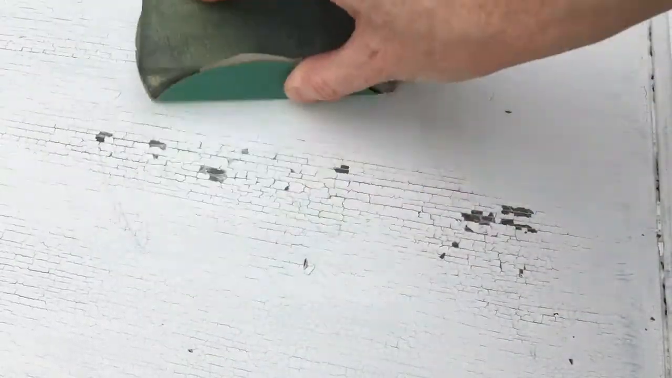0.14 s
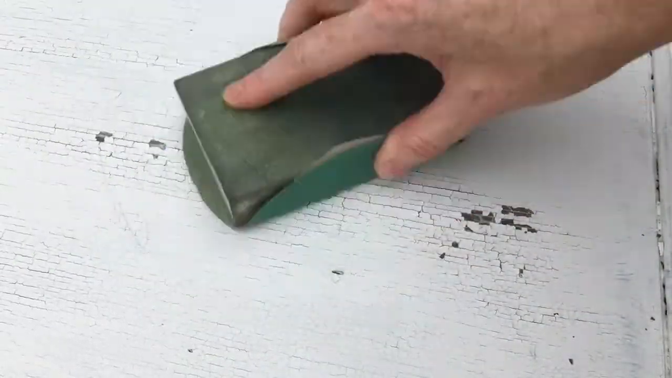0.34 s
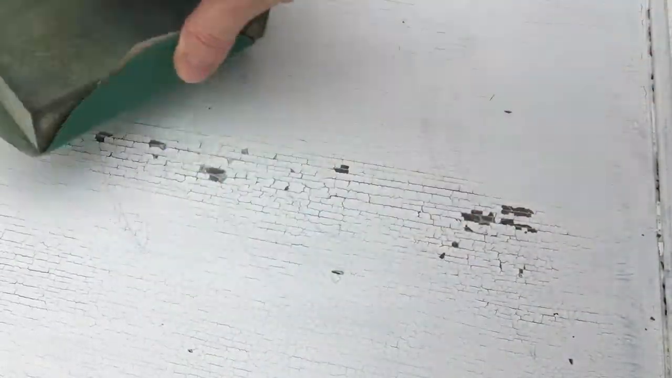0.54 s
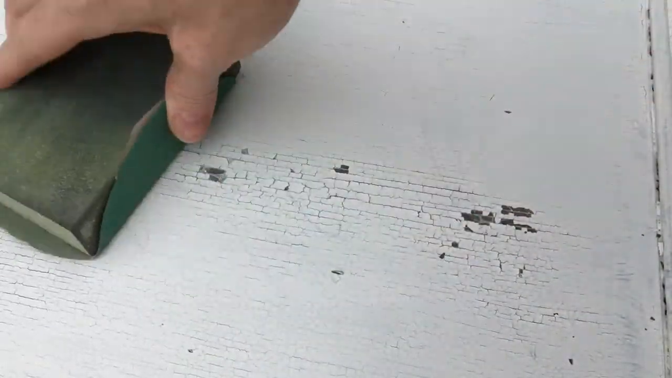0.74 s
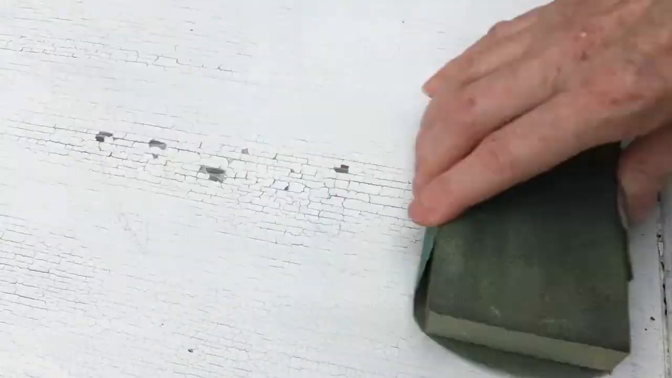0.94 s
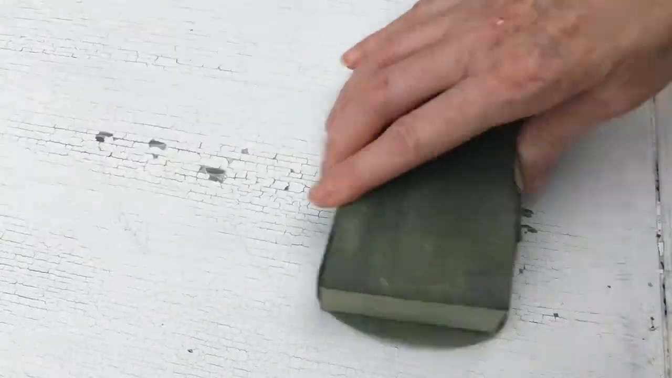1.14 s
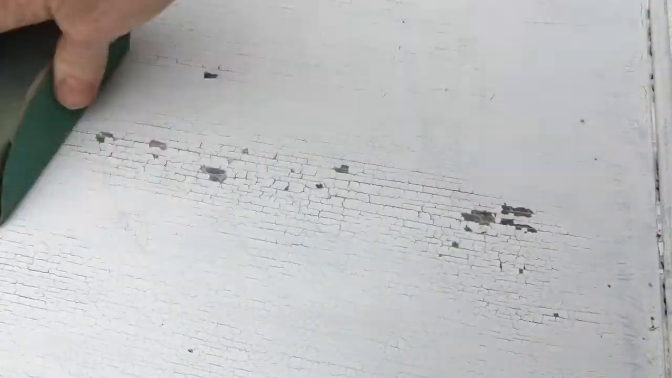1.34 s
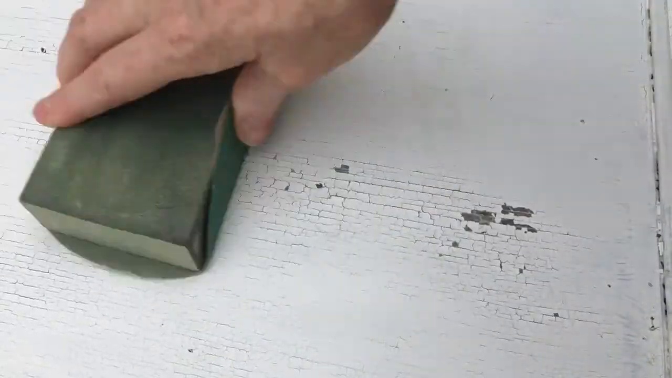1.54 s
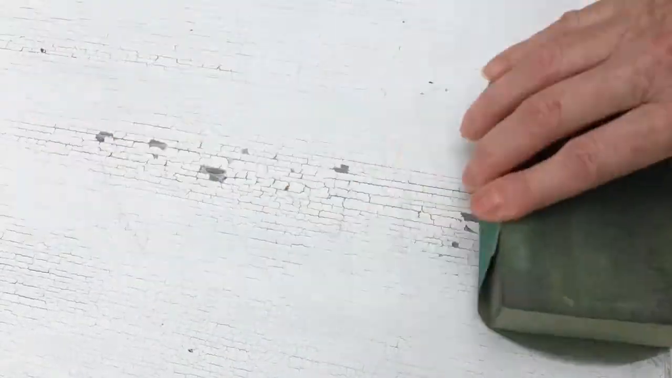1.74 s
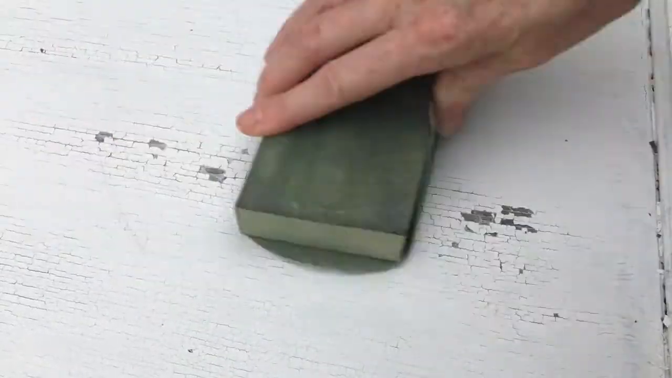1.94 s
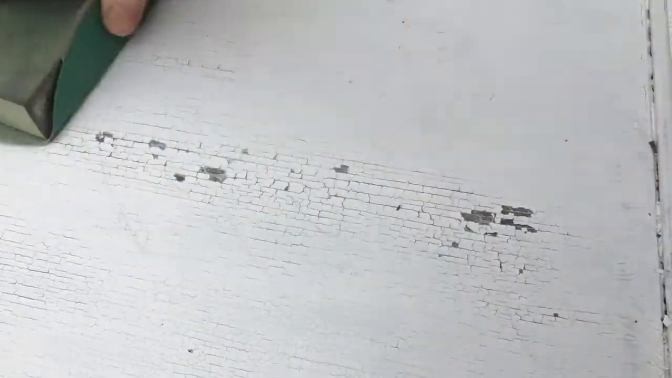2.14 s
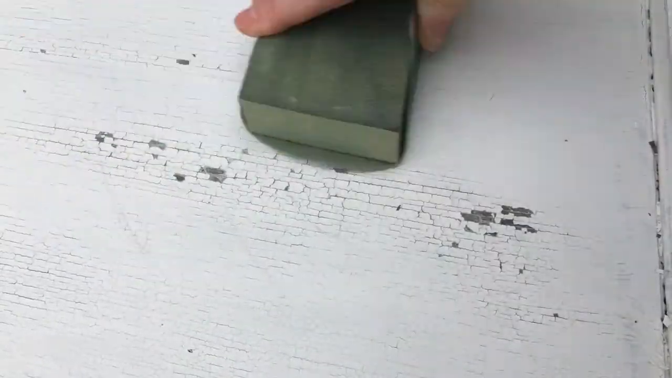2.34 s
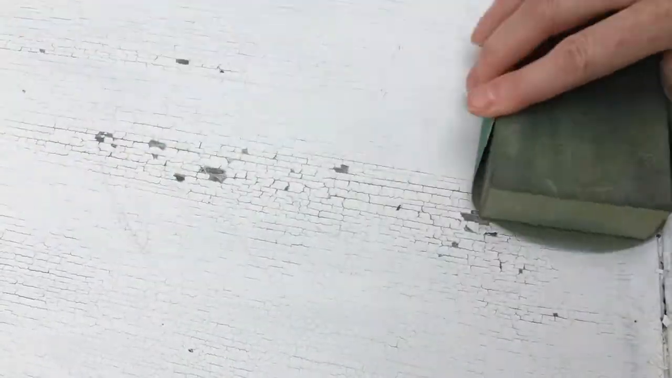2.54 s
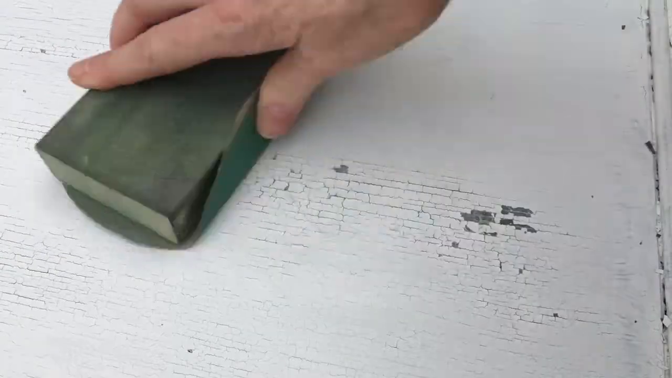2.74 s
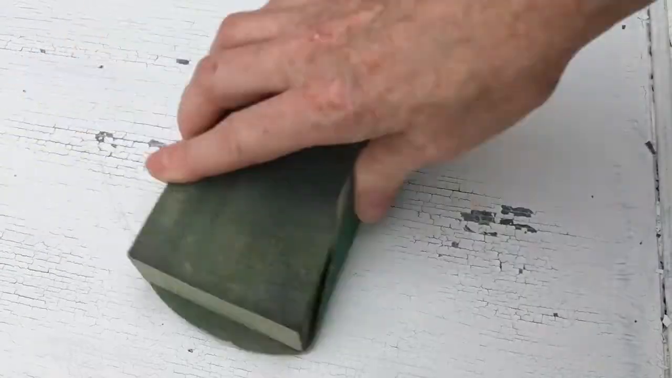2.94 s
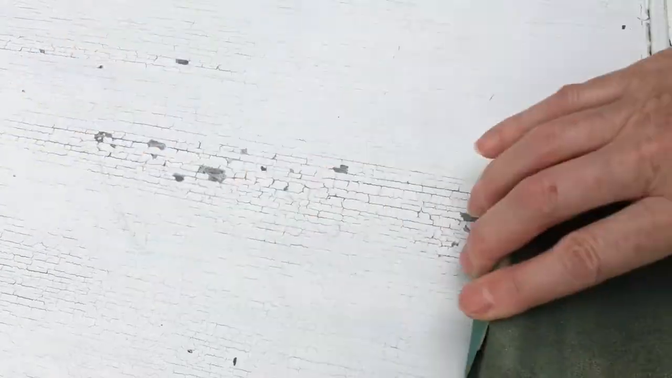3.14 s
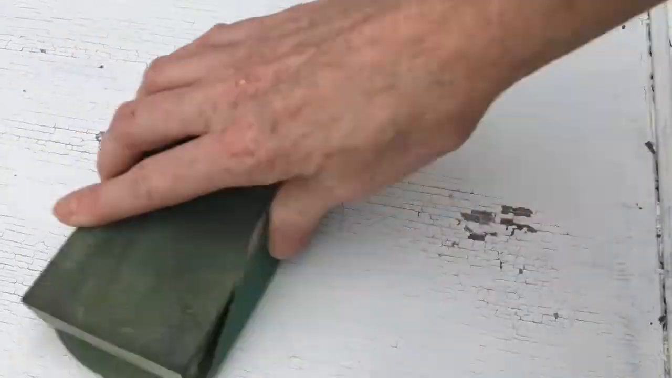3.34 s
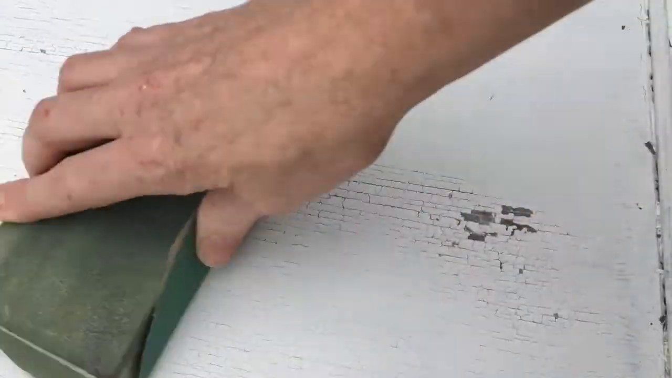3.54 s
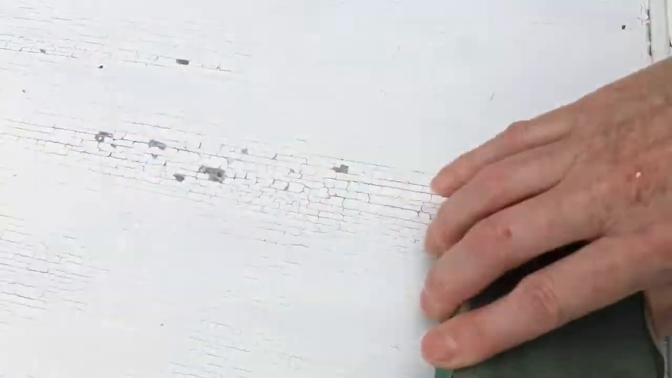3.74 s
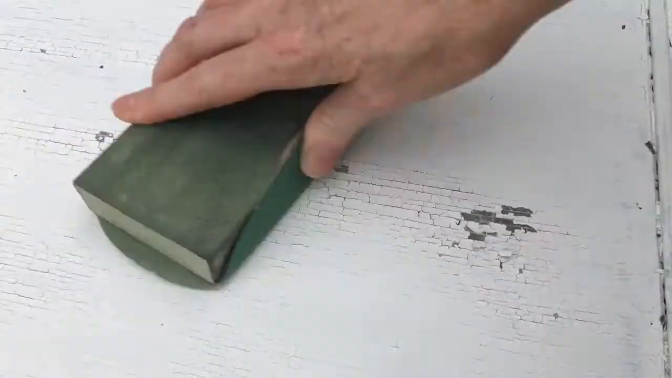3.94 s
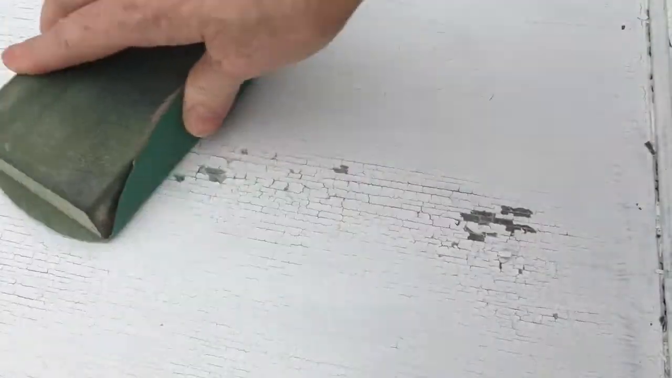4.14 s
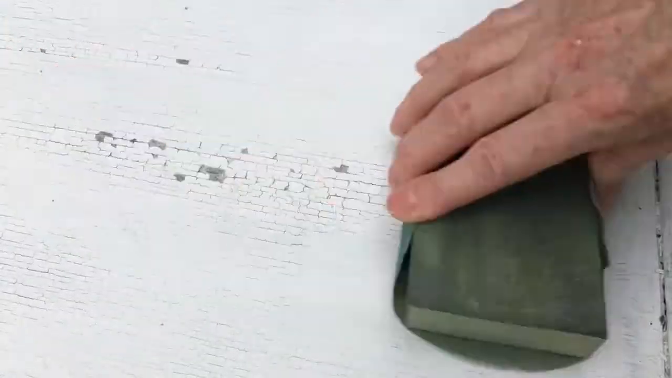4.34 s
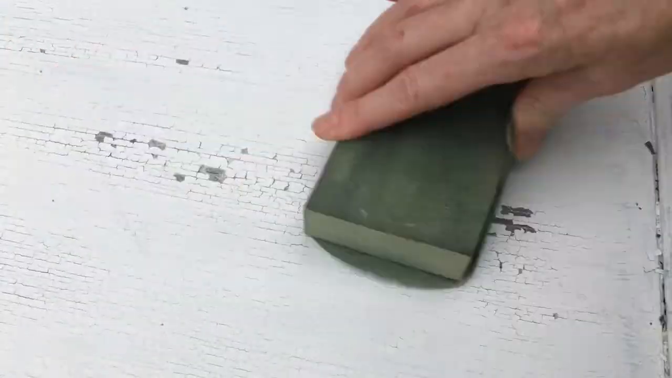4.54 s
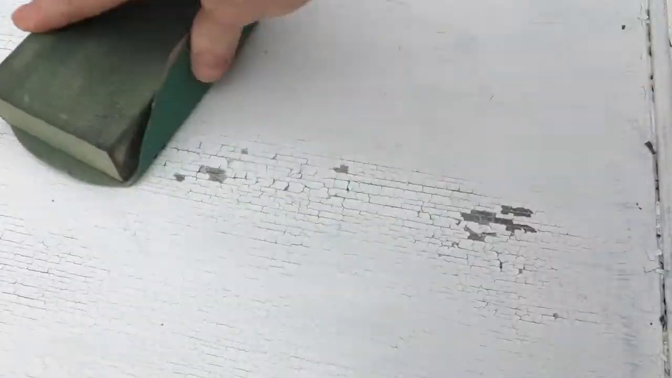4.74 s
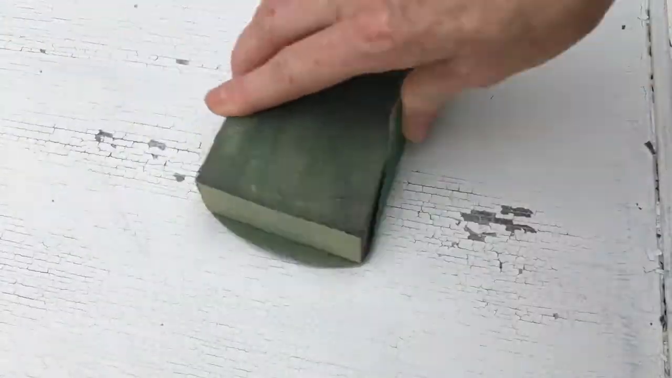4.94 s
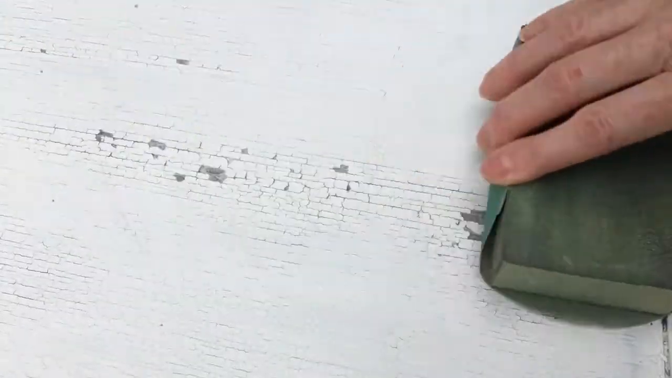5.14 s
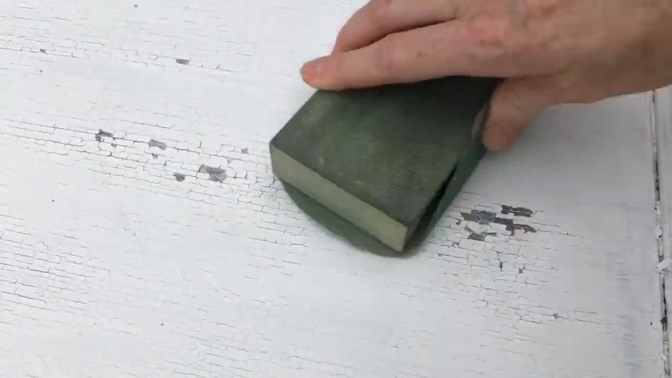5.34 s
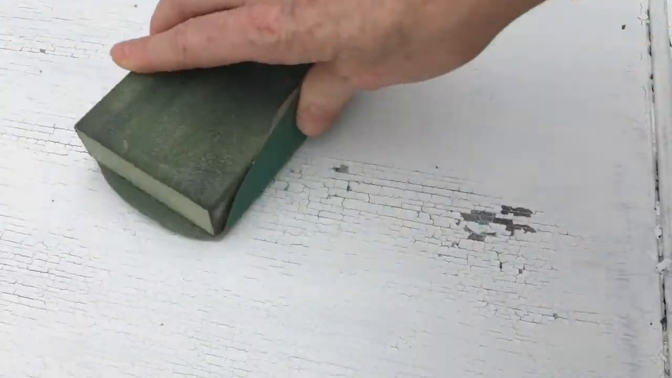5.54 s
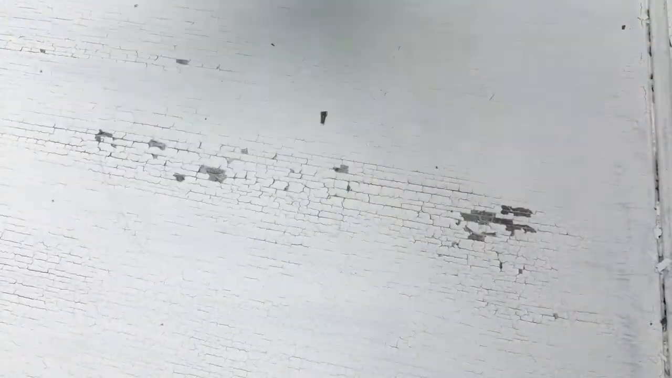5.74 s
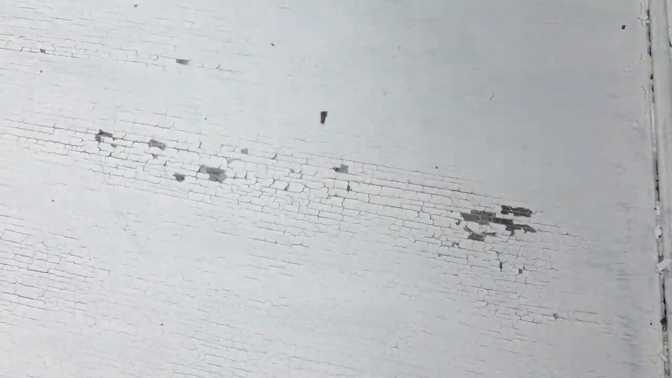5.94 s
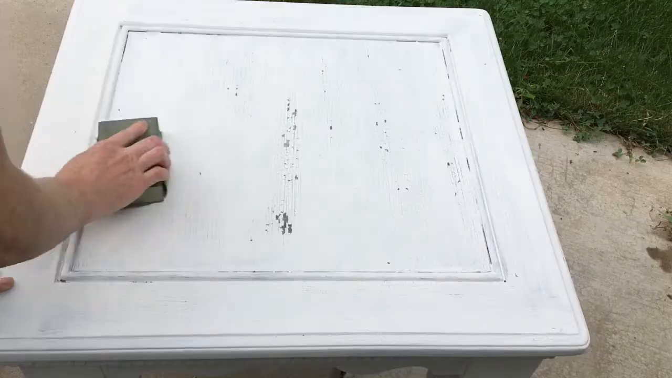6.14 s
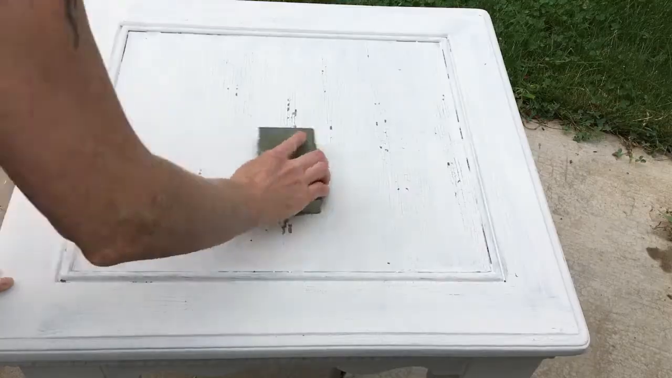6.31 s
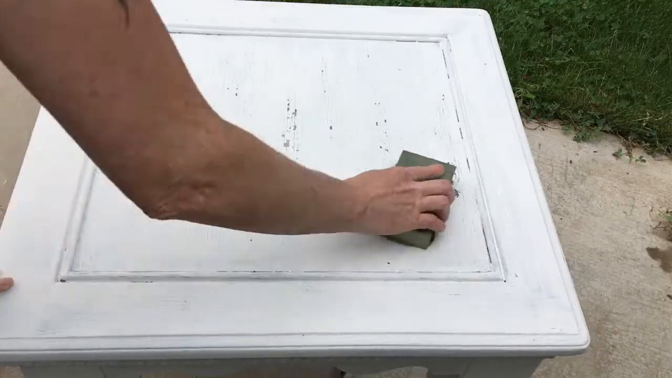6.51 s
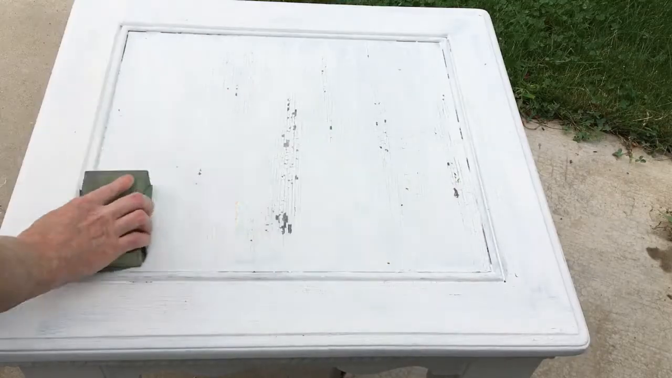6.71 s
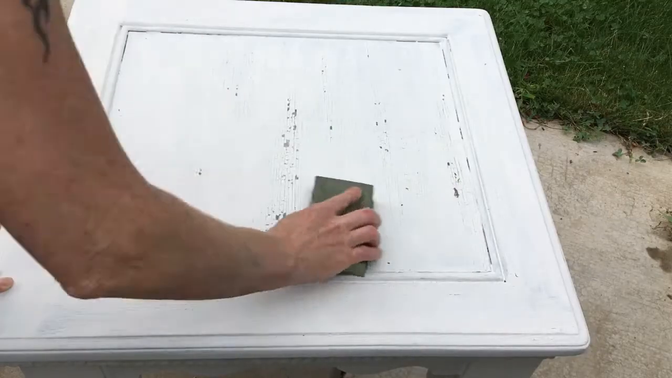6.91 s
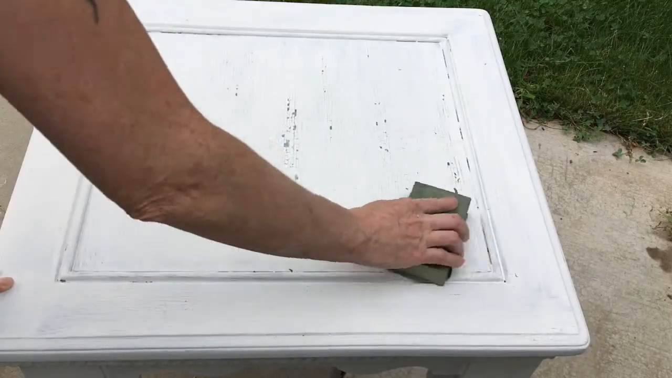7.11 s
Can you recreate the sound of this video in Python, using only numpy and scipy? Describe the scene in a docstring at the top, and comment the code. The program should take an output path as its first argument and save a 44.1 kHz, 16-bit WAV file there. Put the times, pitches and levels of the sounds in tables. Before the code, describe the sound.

A sanding sponge rubs over a painted wooden table, close by and outdoors. Three short, scratchy strokes come first, then a brief gap at about 0.5 seconds, ended by a sharp little tap and a soft knock. From 0.7 seconds the sanding runs steadily back and forth, about three strokes a second, each a dry rasp that swells into a bright hiss and dips at the turn. The table gives occasional soft, dull bumps. At about 5.5 seconds the strokes stop, leaving a few very faint ticks. A tap at 6.1 seconds restarts the sanding, which continues until the end at about 7.3 seconds. A low rumble of distant traffic lies underneath throughout. A far engine hums and fades over the first second, another motor passes very faintly around 5.5 seconds, and a deeper hum grows during the last second.

```python
"""Sanding a painted table outdoors.

A sanding sponge is rubbed back and forth over a wooden table top, close by. Countless grit
scratches merge into a hiss that brightens with speed and changes colour across the board.
Sponge and paint crumbs tap lightly, and bumps ring the low modes of the table.
Far engines hum at their firing orders over a low rumble of traffic."""
import sys
import numpy as np
from scipy import signal
from scipy.fft import rfft, irfft, next_fast_len
from scipy.io import wavfile
from scipy.ndimage import uniform_filter1d

SR = 44100
rng = np.random.default_rng(int(sys.argv[2]) if len(sys.argv) > 2 else 0)


def dump_mix(stems):
    """Bounce the given channels to the path in sys.argv[1] as a 16-bit WAV at rate SR."""
    frames = np.atleast_2d(stems).T  # one column per channel
    limited = np.clip(frames, -1, 1)  # hard clip at full scale
    pcm = np.round(limited * 32767).astype(np.int16)
    wavfile.write(sys.argv[1], SR, pcm)


N = 320607
TIME = np.arange(N) / SR

# one list of rows a stroke: (t/s, hiss level/dB set by speed, rasp level/dB set by pressure)
STROKES = [
    [(0.0, -40, -49), (0.036, -32.5, -43), (0.104, -32.5, -43.5), (0.124, -43, -49), (0.133, -69, -71)],
    [(0.154, -58, -55), (0.168, -38.5, -48.5), (0.214, -33, -44), (0.254, -30.5, -46), (0.285, -45, -49)],
    [(0.285, -48, -51), (0.321, -36, -42.5), (0.347, -36, -38), (0.377, -38, -44.5), (0.423, -49, -63),
     (0.435, -57, -46)],
    [(0.709, -52, -49), (0.719, -41, -45), (0.767, -30.5, -39.5), (0.889, -31, -43), (0.983, -39, -43),
     (1.003, -45, -48.5), (1.012, -57, -57.5)],
    [(1.055, -58, -52), (1.067, -44, -46), (1.117, -34.5, -41), (1.149, -31, -44.5), (1.319, -31.5, -41.5),
     (1.351, -36, -45), (1.375, -43, -46), (1.387, -59, -51)],
    [(1.433, -56, -69), (1.441, -41.5, -46.5), (1.483, -32, -43.5), (1.625, -31.5, -42.5),
     (1.741, -37, -42.5), (1.761, -49, -41), (1.78, -54, -56)],
    [(1.83, -59, -52), (1.838, -44.5, -43), (1.886, -32.5, -42.5), (1.928, -30, -42.5), (2.072, -33.5, -44),
     (2.116, -38.5, -43), (2.134, -47, -48), (2.146, -59, -52)],
    [(2.184, -57, -49.5), (2.192, -40.5, -47), (2.222, -35, -42.5), (2.314, -29.5, -41), (2.4, -31, -43),
     (2.456, -36.5, -42.5), (2.47, -48, -51), (2.477, -57, -55)],
    [(2.484, -51, -50.5), (2.51, -64, -49.5), (2.534, -43, -47.5), (2.548, -50, -44)],
    [(2.548, -56, -41), (2.56, -43, -44.5), (2.608, -32, -41), (2.726, -32, -44), (2.764, -33, -43),
     (2.808, -46.5, -47), (2.82, -60, -50.5)],
    [(2.855, -55, -55), (2.871, -39, -46.5), (2.929, -30, -41), (2.983, -31, -42.5), (3.097, -36.5, -41.5),
     (3.115, -41, -45), (3.126, -59, -57)],
    [(3.171, -58, -54), (3.179, -47.5, -44.5), (3.233, -31.5, -43), (3.279, -30, -43), (3.411, -33, -41.5),
     (3.419, -32, -44.5), (3.449, -44, -42.5), (3.461, -55, -58)],
    [(3.503, -57, -59), (3.513, -42, -48), (3.531, -35, -42), (3.573, -28.5, -40.5), (3.687, -30.5, -41.5),
     (3.749, -38.5, -43), (3.785, -64, -52)],
    [(3.802, -58, -63), (3.832, -38, -41.5), (3.85, -32, -40.5), (3.89, -30.5, -42), (4.008, -33.5, -43),
     (4.058, -43, -44), (4.078, -62, -58)],
    [(4.118, -62, -53), (4.124, -43.5, -52), (4.138, -39, -46), (4.206, -31, -43.5), (4.304, -31.5, -43),
     (4.4, -39.5, -46), (4.422, -53, -44), (4.432, -66, -58)],
    [(4.46, -57, -58), (4.49, -42, -45), (4.524, -32.5, -44), (4.594, -31.5, -44), (4.662, -31.5, -44.5),
     (4.722, -39.5, -44), (4.744, -46.5, -46), (4.758, -60, -57)],
    [(4.804, -60, -57), (4.812, -45, -49), (4.86, -35.5, -43.5), (4.962, -33.5, -43), (5.12, -38.5, -43.5),
     (5.128, -44, -47), (5.134, -70, -47)],
    [(5.208, -75, -61), (5.24, -46, -48), (5.262, -38, -44.5), (5.364, -34, -44.5), (5.448, -39.5, -44),
     (5.524, -51, -51.5), (5.546, -55, -61), (5.555, -64, -75)],
    [(6.126, -39, -47), (6.132, -30, -42), (6.158, -39, -42), (6.18, -57, -53)],
    [(6.202, -51, -57), (6.212, -47.5, -50), (6.256, -33, -42.5), (6.36, -32, -45), (6.426, -33.5, -39),
     (6.445, -65, -54)],
    [(6.479, -55, -56), (6.503, -42, -44.5), (6.545, -33.5, -45), (6.657, -32.5, -42.5),
     (6.675, -30, -40.5), (6.715, -33, -41), (6.75, -61, -57)],
    [(6.762, -55, -55), (6.782, -49, -47), (6.834, -32.5, -41.5), (6.954, -33, -43.5),
     (7.012, -36.5, -44.5), (7.038, -47, -45.5), (7.047, -57, -55)],
    [(7.087, -56, -57), (7.101, -48, -51), (7.157, -35, -43), (7.257, -33, -45.5), (7.27, -37, -38)],
]
# broad spectrum of grit on paint: (f/Hz, spectral level/dB)
GRIT_SPECTRUM = [(60, -16.5), (150, -11), (300, -17.5), (450, -16), (850, -13.5), (1100, -8.5), (2000, -4),
                 (4000, -3), (6000, 0), (9000, -3.5), (13000, -3), (15800, -8)]
# resonances and hollows of board and sponge: (f/Hz, width/Hz, gain/dB)
BOARD_RESONANCES = [(1130, 160, 1), (2336, 295, 3.5), (2820, 345, 4.5), (3180, 275, -5.5),
                    (3650, 510, -4.5), (4510, 450, 1), (4910, 160, -6), (6220, 830, 1.5), (7880, 790, -1.5),
                    (8870, 1630, 5), (10360, 830, -3), (11370, 900, 1)]


def amp(db):
    """Amplitude ratio of a level in decibels."""
    return 10 ** (np.asarray(db) / 20)


def unit(x):
    """Normalisation to an rms of 1."""
    return x / np.sqrt(np.mean(x ** 2) + 1e-20)


def log_interp(points, hz):
    """Interpolation of (f/Hz, value) points on a logarithmic frequency axis."""
    f, value = np.transpose(points)
    return np.interp(np.log(hz + 1), np.log(f + 1), value)


def bumps(rows, hz):
    """Gaussian peaks and hollows of a spectrum, summed in dB."""
    return sum(db * .5 ** ((2 * (hz - centre) / width) ** 2) for centre, width, db in rows)


def coloured(x, spectrum, peaks=()):
    """Filtering by a spectral envelope with optional peaks, to an rms of 1."""
    hz = np.fft.rfftfreq(len(x), 1 / SR)
    return unit(irfft(rfft(x) * amp(log_interp(spectrum, hz) + bumps(peaks, hz)), len(x)))


def wander(rate_hz):
    """Slow random fluctuation: low-passed noise with an rms of 1."""
    size = next_fast_len(N)
    hz = np.fft.rfftfreq(size, 1 / SR)
    return unit(irfft(rfft(rng.standard_normal(size)) * np.exp(-(hz / rate_hz) ** 2), size)[:N])


def add(mix, start_s, sound):
    """Superposition of a sound on the mix from a given time."""
    part = mix[max(round(start_s * SR), 0):][:len(sound)]
    part += sound[:len(part)]


def sponge_position(t):
    """Harmonic motion: the arm swings in half cosines between turns, fastest in the middle."""
    # turning points: (t/s, position from about -1 left to 1 right)
    turns = [(0, 0.65), (.43, .6), (.7, -.7), (1.03, 1), (1.41, -1.05), (1.8, 0.13), (2.14, -1),
             (2.47, -0.32), (2.83, -0.82), (3.15, 1.33), (3.48, 0.32), (3.79, 1.4), (4.05, -1.2),
             (4.44, 0.84), (4.74, -1.04), (5.17, 0.81), (5.55, -0.84), (6.18, -0.31), (6.46, 0.91),
             (6.76, 0.36), (7.06, 0.93), (7.27, 1.06)]
    turn_s, position = np.transpose(turns)
    leg = np.interp(t, turn_s, np.arange(len(turns)))
    eased = np.floor(leg) + (1 - np.cos(np.pi * (leg % 1))) / 2
    return np.interp(eased, np.arange(len(turns)), position)


def sliding(grip_s=.0025):
    """Sliding friction needs motion: 1 during a stroke, 0 while the sponge sticks or is lifted."""
    inside_s = (np.minimum(TIME - rows[0][0], rows[-1][0] - TIME) for rows in STROKES)
    return np.clip(sum(np.clip(s / grip_s + .5, 0, 1) for s in inside_s), 0, 1)


def scratches(coarse_per_s=2500, coarse_db=-11, flutter_db=.18, flutter_hz=130):
    """Roughness noise: fine grit merges, coarse grains snap, cracked paint makes the contact flutter."""
    fine, strength = rng.standard_normal((2, N))
    coarse = unit(strength * (rng.random(N) < coarse_per_s / SR))
    return unit((fine + amp(coarse_db) * coarse) * amp(flutter_db * wander(flutter_hz)))


def sanding(patchy_db=1.47):
    """Source and filter: the board colours the scratches by position, and speed lifts the treble."""
    # change of colour towards the right of the board: (f/Hz, width/Hz, gain/dB at position 1)
    right_side = [(2500, 1800, 2.44), (3260, 500, 5.5), (4070, 2400, -4), (8000, 2000, -1.1)]
    # weight with which each frequency follows speed rather than pressure: (f/Hz, weight)
    speed_weights = [(400, 0.0019), (1200, -0.39), (2500, 0.27), (4000, 0.57), (6000, 0.87), (9000, 0.99),
                     (15000, 1.03)]
    frames = dict(nperseg=512, noverlap=384)
    hz, t, spectra = signal.stft(scratches(), SR, **frames)
    stroke_s, hiss_db, rasp_db = np.concatenate(STROKES).T
    colour_db = log_interp(GRIT_SPECTRUM, hz) + bumps(BOARD_RESONANCES, hz)
    # hiss and rasp are each referred to the power in their own band
    power = amp(colour_db) ** 2
    hiss_band, rasp_band = (hz > 4000) & (hz < 15000), (hz > 900) & (hz < 3000)
    speed_db = np.interp(t, stroke_s, hiss_db) - 10 * np.log10(np.mean(power * hiss_band))
    pressure_db = np.interp(t, stroke_s, rasp_db) - 10 * np.log10(np.mean(power * rasp_band))
    weight = log_interp(speed_weights, hz)
    gain_db = colour_db[:, None] + np.outer(weight, speed_db) + np.outer(1 - weight, pressure_db)
    # the colour changes most near the ends of the board
    side = sponge_position(t)
    gain_db += np.outer(bumps(right_side, hz), side * abs(side))
    # the contact patch keeps changing, so small resonances come and go
    patches = uniform_filter1d(rng.standard_normal(spectra.shape), size=5, axis=0)
    gain_db += patchy_db * unit(uniform_filter1d(patches, size=24, axis=1))
    return signal.istft(spectra * amp(gain_db), SR, **frames)[1][:N] * sliding()


def reverberation(x, wet_db=-28):
    """Scattering from ground and walls leaves a faint exponential tail, the treble dying first."""
    # reverberation time: (f/Hz, t60/s)
    decay_times = [(200, 0.32), (2000, 0.9), (8000, 0.28), (15000, 0.18)]
    hz, t, spectra = signal.stft(rng.standard_normal(SR // 2), SR, nperseg=256)
    tail = signal.istft(spectra * amp(-60 * t / log_interp(decay_times, hz)[:, None]), SR)[1]
    return amp(wet_db) * signal.fftconvolve(x, tail / np.linalg.norm(tail))[:N]


def engine(course, orders, drone=None, waver_db=.7, fade_s=.073):
    """Periodic firing makes a harmonic series; only the lowest orders carry far, each wavering alone."""
    t, firing_hz, db = np.transpose(course)
    phase = 2 * np.pi * np.cumsum(np.interp(TIME, t, firing_hz)) / SR
    hum = sum(amp(level + waver_db * wander(9)) * np.sin(order * phase) for order, level in orders)
    hum *= amp(np.interp(TIME, t, db))
    if drone is not None:
        hum += amp(np.interp(TIME, *np.transpose(drone))) * np.sin(3 * phase)
    outside_s = np.maximum(np.maximum(t[0] - TIME, TIME - t[-1]), 0)
    return np.sqrt(2) * hum * np.exp(-outside_s / fade_s)


def fading_engine():
    """Two firing harmonics fade away while the exhaust drones on the third."""
    # firing rate and loudness: (t/s, f/Hz, level/dB)
    course = [(0, 71, -32.5), (.14, 70.8, -33), (.3, 70.7, -42), (.55, 70.8, -38), (.74, 70.3, -38),
              (.9, 69.5, -45), (1.02, 69.3, -44), (1.2, 69.2, -48), (1.4, 68, -62)]
    # harmonics: (order, relative level/dB)
    orders = [(1, 0), (2, -12)]
    # exhaust drone: (t/s, level/dB)
    drone = [(0, -43.5), (.3, -45), (.57, -44.5), (.75, -45), (.93, -56), (1.3, -81)]
    return engine(course, orders, drone)


def traffic(level_db=-46.5, swell_db=1.67):
    """Distant traffic adds incoherently to a dull rumble that swells a little and slowly recedes."""
    # outdoor background: (f/Hz, spectral level/dB)
    spectrum = [(20, -42.5), (35, -12.5), (55, 0.5), (110, -1.5), (160, -5.5), (230, -13.5), (320, -18.5),
                (500, -25), (800, -25.5), (1500, -29.5), (2300, -34.5), (3000, -39.5), (4500, -50.5),
                (7000, -57), (15000, -60.5)]
    # narrow hums and whines in it: (f/Hz, width/Hz, gain/dB)
    hums = [(70, 7.5, 5), (118.7, 6.4, 5.5), (141.7, 7.8, 5), (152.8, 9, 5.5), (1032, 78, 7.5),
            (5630, 350, 9.5)]
    # slow decline: (t/s, relative level/dB)
    trend = [(0, 4), (1, 2.5), (1.8, 2), (3, 0), (4.5, 0), (5.7, -1), (6.5, -2), (7.27, -1)]
    envelope = amp(level_db + np.interp(TIME, *np.transpose(trend)) + swell_db * wander(1.1))
    return envelope * coloured(rng.standard_normal(next_fast_len(N)), spectrum, hums)[:N]


def creep(level_db=-66, grains_per_s=6000, longest_turn_s=.1):
    """Microslip: at each quick turn the stuck sponge shears, and single grains let go."""
    stuck = np.zeros(N)
    for before, after in zip(STROKES, STROKES[1:]):
        stop, start = before[-1][0], after[0][0]
        stuck += (start - stop < longest_turn_s) * (TIME > stop) * (TIME < start)
    grains = rng.standard_normal(N) * (rng.random(N) < grains_per_s / SR)
    return amp(level_db) * stuck * coloured(grains, GRIT_SPECTRUM, BOARD_RESONANCES)


def taps():
    """Heavily damped contacts: sponge and paint crumbs make short noise bursts with no ring, and one bright
    burst marks the abrupt return of sound at 6.126 s."""
    # light touches: (t/s, level/dB, t60/s, tilt/dB per octave); the last row is a sharp, bright burst with
    # which the sound starts abruptly at 6.126 s
    touches = [(0.535, -55, .015, 0), (0.639, -56, .02, 2), (.655, -31, 0.013, 1.5), (1.045, -55, .02, 3),
               (1.812, -54, .03, 2), (2.457, -39, .025, 1), (5.147, -49, 0.069, -3),
               (5.801, -57, 0.026, -1), (5.885, -70.5, 0.13, 5), (5.9, -70, .04, 2), (5.92, -75, .08, 4),
               (6.126, -35.5, .03, 6.5)]
    # spectrum of a touch before its tilt: (f/Hz, spectral level/dB)
    spectrum = [(100, -7.5), (350, 2), (700, 8), (1200, 0), (2200, 1), (3500, -9.5), (8000, -15),
                (15000, -27)]
    out, t = np.zeros(N), TIME[:SR // 10]
    for start_s, db, t60, tilt in touches:
        tilted = [(hz, level + tilt * np.log2(hz)) for hz, level in spectrum]
        add(out, start_s, amp(db - 60 * t / t60) * coloured(rng.standard_normal(len(t)), tilted))
    return out


def knocks():
    """Modal vibration: a push rings the table's damped modes; a soft one favours the lowest."""
    # the table is bumped or rocks: (t/s, level/dB, rise time/s); the row at 6.125 s makes the modes ring as the
    # sound starts abruptly
    pushes = [(.654, -42.5, 0.00076), (1.341, -43, .004), (1.561, -39.5, .005), (2.472, -40, 0.0031),
              (3.117, -47, 0.00051), (3.147, -44, .005), (4.29, -40.5, 0.0056), (5.124, -37.5, 0.003),
              (6.125, -49, 0.00069), (6.486, -36.5, 0.005), (6.719, -46, 0.0025)]
    # its low modes: (f/Hz, relative level/dB, t60/s)
    modes = [(137.6, 8, 0.17), (162.5, -10, .12), (226, -14, 0.046), (315, 1.5, .06), (348, -2, 0.082),
             (455, 6.5, 0.021), (725, -4, .04)]
    out, t = np.zeros(N), TIME[:SR // 2]
    lowest_hz = modes[0][0]
    for start_s, push_db, rise_s in pushes:
        for hz, mode_db, t60 in modes:
            excitation = 1 / (1 + ((hz - lowest_hz) * rise_s * 2) ** 2)
            envelope = amp(push_db + mode_db - 60 * t / t60) * (1 - np.exp(-t / rise_s))
            add(out, start_s, excitation * envelope * np.sin(2 * np.pi * hz * t))
    return out


def passing_motor():
    """A far motor passes, heard as its fundamental alone, sinking slightly in pitch."""
    # pitch and loudness: (t/s, f/Hz, level/dB)
    course = [(4.9, 235, -62), (5.2, 233, -66), (5.48, 230.6, -55.5), (5.72, 225.5, -60.5),
              (6.1, 223.6, -67.5)]
    return engine(course, orders=[(1, .0035)])


def deep_engine():
    """Slower firing gives a deeper hum, which grows as the engine draws near."""
    # firing rate and loudness: (t/s, f/Hz, level/dB)
    course = [(6.1, 51, -54), (6.35, 50.9, -50.5), (6.65, 44.9, -45.5), (6.9, 54, -44), (7.02, 56.6, -51),
              (7.11, 54.8, -40.5), (7.2, 55.8, -37), (7.28, 55.9, -41.5)]
    # harmonics: (order, relative level/dB)
    orders = [(1, 0.5), (2, -12.5)]
    return engine(course, orders)


def scene():
    """Superposition of all sources at one point, alike in both channels."""
    work = sanding() + creep() + knocks() + taps()
    engines = fading_engine() + deep_engine() + passing_motor()
    return np.tile(work + reverberation(work) + engines + traffic(), (2, 1))


def record(dry, cutoff_hz=15790):
    """Band limiting: a linear-phase low-pass filter removes the highest treble."""
    lowpass = signal.firwin(801, cutoff_hz, window=("kaiser", 8), fs=SR)
    return signal.oaconvolve(dry, lowpass[None], "same")


dry = scene()
out = record(dry)
dump_mix(out)
```